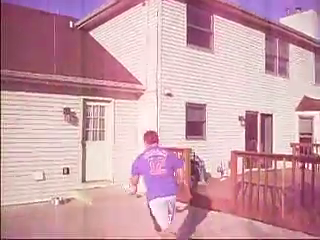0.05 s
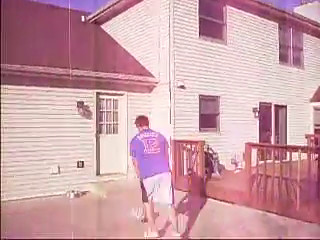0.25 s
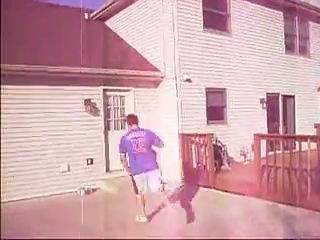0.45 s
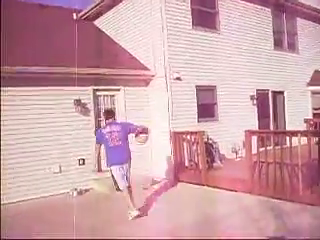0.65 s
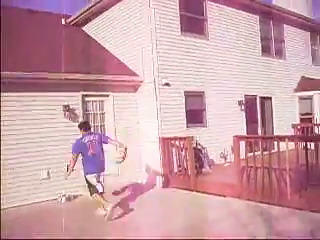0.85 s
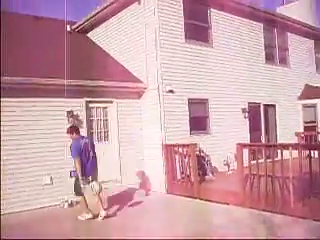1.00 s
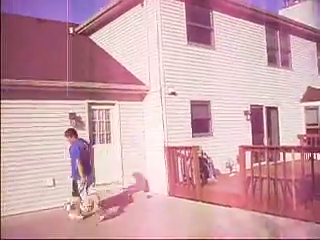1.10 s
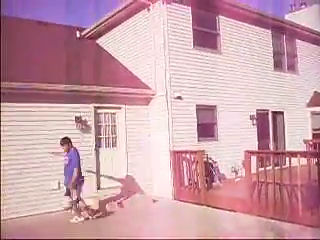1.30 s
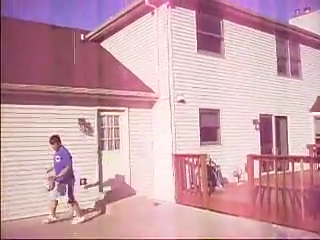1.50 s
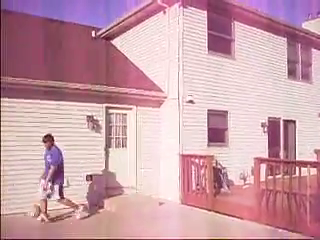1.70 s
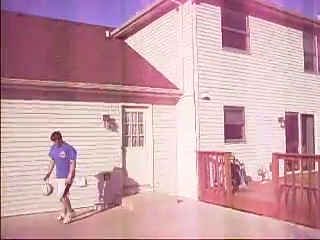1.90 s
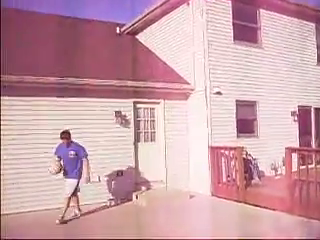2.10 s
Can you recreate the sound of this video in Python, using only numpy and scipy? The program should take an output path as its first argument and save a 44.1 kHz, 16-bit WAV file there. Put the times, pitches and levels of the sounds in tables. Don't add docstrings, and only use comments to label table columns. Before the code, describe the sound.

Shoes scuff, then a basketball hits concrete early, again past the middle, and once more soon after, with quick slaps off nearby house walls; footfalls, faint squeaks and small ticks over low wind, muffled camera microphone.

```python
import sys
import numpy as np
from scipy import signal
from scipy.fft import rfft, irfft
from scipy.io import wavfile
from scipy.ndimage import uniform_filter1d

SR = 44100
rng = np.random.default_rng(int(sys.argv[2]) if len(sys.argv) > 2 else 0)


def pcm_store(signal):
    levels = np.round(np.clip(np.atleast_2d(signal), -1, 1) * 32767)
    wavfile.write(sys.argv[1], SR, levels.astype(np.int16).T)


def voltage_ratio(decibels):
    exponent = np.asarray(decibels, float) / 20
    return 10 ** exponent


N = 94815

# t/s, crack level/dB, skin level/dB, shell level/dB, thump level/dB
ARRIVALS = [(.2800, -26, -0.5, -3, -1.5), (0.2898, -20, -7.5, -17, -9), (0.296, -5, -17, -9, -13.5),
            (0.3027, -24, -14, -16, -14), (0.3049, -26.5, -20, -19, -14.5), (1.2137, -7, -12, -14, -20),
            (1.2249, -10.5, -17, -19, -20), (1.2262, -40, -20.5, -24, -31), (1.2335, -26, -28, -22, -25),
            (1.8120, -3.5, -2.5, -23, -19), (1.8192, -3.5, -17, -23, -24), (1.8244, -28, -13, -22, -15.5),
            (1.8255, -33, -15, -34, -17.5), (1.8298, -22, -24, -36, -22)]
# f/Hz, level/dB, t60/s
SKIN_MODES = [(3120, -5.5, 0.01), (3424, -4.5, 0.0068), (4940, 5, 0.0025), (4080, 1.5, 0.0039),
              (2910, -27, .03)]
# f/Hz, level/dB, t60/s
SHELL_MODES = [(847, -3.5, 0.018), (1010, -6.5, 0.017), (1318, -5, 0.012), (777, -11, 0.018)]
# f/Hz, level/dB, t60/s
THUMP_MODES = [(232.7, 2.5, 0.036), (171, -6.5, 0.044), (300, -28, 0.021)]
# t/s, level/dB, build-up/s
YARD_SCATTER = [
    (0.2803, -34.5, .002),
    (.288, -22, 0.0085),
    (1.214, -34, .002),
    (1.224, -28, 0.004),
    (1.8123, -32, .002),
    (1.819, -25.5, 0.0055),
]
# f/Hz, t60/s
YARD_DECAY = [(100, 0.37), (300, 0.12), (1000, 0.096), (3000, 0.093), (6000, 0.073)]
# f/Hz, level/dB
YARD_COLOUR = [(60, -7.5), (200, 0), (450, -16), (900, -3.5), (2000, -13.5), (3000, -10.5), (4500, -14),
               (6500, -19.5)]
# t/s, length/s, dull level/dB, bright level/dB, rise/share of length
STROKES = [(0.028, 0.044, -46, -48, 0.17), (0.051, 0.014, -39, -39, .3), (0.058, 0.045, -35, -46.5, 0.24),
           (0.112, 0.13, -44.5, -53.5, 0.062), (0.338, 0.12, -42.5, -47, .5),
           (0.413, 0.072, -51.5, -47.5, 0.16), (0.655, 0.027, -57, -54, .1),
           (0.837, 0.011, -38, -37.5, 0.25), (0.847, 0.039, -38.5, -50.5, 0.079),
           (0.929, 0.11, -44, -62, 0.52), (1.171, 0.18, -42.5, -50, 0.043),
           (1.385, 0.037, -43.5, -50.5, 0.31), (1.643, 0.014, -35, -41, 0.064),
           (1.647, 0.048, -48, -56, .2), (1.845, 0.06, -45, -43, .1), (2.06, 0.08, -49.5, -52, .3),
           (0.864, 0.083, -49.5, -64, 0.49), (1.015, 0.14, -49.5, -70, 0.65),
           (1.479, 0.037, -46.5, -55.5, 0.15), (1.528, 0.089, -53.5, -53.5, 0.244),
           (1.671, 0.038, -47.5, -64, 0.26), (1.947, 0.079, -50, -55, 0.53), (0, 0.074, -46.5, -51, 0.11)]
# f/Hz, width/Hz, level/dB
GRIT_BANDS = [(300, 134, -0.5), (720, 490, 5.5), (1270, 150, -18), (2234, 375, 0), (2965, 570, 3),
              (4210, 1800, 2.5)]
# t/s, peak level/dB,
# f/Hz, t60/s
THUDS = [(.0624, -22, 346, 0.018), (.0826, -26.5, 690, 0.036), (.089, -33, 720, 0.08),
         (.0705, -36.5, 700, 0.076), (0.1276, -30.5, 420, 0.031), (0.458, -30, 300, 0.032),
         (0.546, -31.5, 65, 0.12), (.543, -36, 260, 0.065), (.475, -35, 200, 0.046),
         (0.902, -26.5, 201, 0.018), (0.9989, -25, 260, 0.018), (1.0059, -25.5, 540, 0.012),
         (1.0123, -23, 80, 0.059), (1.0128, -22.5, 240, .04), (1.051, -25.5, 59.7, 0.053),
         (0.98, -28.5, 70, 0.047), (1.8131, -22.5, 121, 0.038), (1.8199, -18.5, 120, 0.03),
         (1.215, -17, 150.5, 0.022), (1.6445, -25.5, 486, 0.013), (1.293, -27, 153, 0.02),
         (1.4871, -20, 270, 0.012), (1.4915, -15, 215, 0.01), (1.5, -28, 78, 0.15),
         (1.51, -28.5, 170, 0.028), (1.525, -29.5, 330, .015), (1.5285, -28, 520, 0.01),
         (1.6352, -28, 240, .04), (1.8517, -16.5, 192, 0.032), (1.8598, -23, 328, 0.024),
         (1.88, -29, 255, 0.035), (2.002, -33.5, 593, 0.057), (2.0076, -30, 250, 0.019)]
# t/s,
# level/dB, f/Hz, t60/s
RUBBER_RINGS = [(1.5465, -33, 2250, .022), (.412, -37, 2050, .1), (.15, -36, 1350, .05),
                (.8386, -21, 950, .025), (1.8709, -14, 720, .018), (1.8612, -20, 800, .01),
                (1.6437, -25, 800, .02), (1.004, -26, 1050, .03), (1.2145, -25, 2950, .05),
                (.443, -40, 2080, .06), (.464, -39, 2000, .04), (.515, -45, 2080, .04),
                (.534, -45, 2100, .05), (.39, -36, 620, .08), (1.491, -33, 950, .02),
                (.1262, -30, 1300, .02), (.032, -31, 3850, .02), (.842, -28, 3600, .015),
                (1.054, -34, 600, .03)]
# t/s, peak level/dB, push (1) or pull (-1)
CLICKS = [(.3962, -16, 1), (.9462, -31, 1), (1.0461, -33, 1), (1.798, -29, 1), (1.9461, -20.5, -1),
          (2.0968, -27.5, 1), (.8394, -24, 1), (.8444, -25, -1), (1.6445, -25.5, 1), (1.6464, -29, -1),
          (.0621, -19, -1), (.0626, -21, -1), (1.1752, -33, 1), (.055, -25, -1), (.0461, -30, 1),
          (.0738, -28, 1), (.1001, -29.5, -1), (.1264, -29, 1), (.85, -29, 1)]
# t/s, level/dB
GUSTS = [(0.0, -45), (0.301, -50), (0.45, -44), (0.56, -49), (0.81, -44), (1.12, -39), (1.29, -48.5),
         (1.51, -44), (1.679, -42), (1.891, -41.5), (2.011, -39.5), (2.15, -43.5)]
# f/Hz, level/dB
WIND_COLOUR = [(12, -42), (20, -1), (38, -2.5), (54, -8.5), (123, -7.5), (500, -30), (650, -47),
               (1100, -120)]
# f/Hz, level/dB
AIR_COLOUR = [(59, -43), (100, -0.5), (361, -7), (555, -7), (658, -11), (866, -11), (2460, -22),
              (4410, -22.5), (6000, -27.5), (7800, -58.5), (13200, -120)]

CONTACT_S, SHELL_LAG_S, THUMP_LAG_S, SQUASH_S = 0.00069, 0.0008, 0.0014, 0.0033
LATE_DB, LATE_T60_S = -12, 0.6
GRIT_PER_S, GRIT_SPREAD_DB = 4000, 4.5
LUMP_DB, AIR_DB, AIR_FOLLOWS = 3.5, -48.5, 0.17
EDGE_HZ, EDGE_WIDTH_HZ = 4847, 2210
CLIFF_HZ, CLIFF_WIDTH_HZ = 6150, 450
OVERLOAD = 0.82


def evened(x):
    return x / np.sqrt(np.mean(x ** 2) + 1e-20)


def read(points, hz):
    f, value = np.transpose(points)
    return np.interp(np.log(hz + 1), np.log(f + 1), value)


def add(mix, s, sound):
    part = mix[max(round(s * SR), 0):][:len(sound)]
    part += sound[:len(part)]


def ring(modes, lag_s, rise_s):
    t = np.maximum(np.arange(6000) / SR - lag_s, 0)
    onset = 1 - np.exp(-t / max(rise_s, 1e-5))
    return onset * sum(voltage_ratio(db - 60 * t / t60) * np.sin(2 * np.pi * hz * t) for hz, db, t60 in modes)


def resonate(x, hz, width):
    r = np.exp(-np.pi * width / SR)
    gain = (1 - r * r) / 2
    return signal.lfilter([gain, 0, -gain], [1, -2 * r * np.cos(2 * np.pi * hz / SR), r * r], x)


def noise(tone, length, t60=None):
    window = 128 if t60 else 2048
    hz, t, z = signal.stft(rng.standard_normal(length), SR, nperseg=window)
    level_db = read(tone, hz)[:, None]
    if t60:
        level_db = level_db - 60 * t / read(t60, hz)[:, None]
    return signal.istft(z * voltage_ratio(level_db), SR, nperseg=window)[1][:length]


def ball():
    out = np.zeros(N)
    skin = ring(SKIN_MODES, 0, 0.00014) * 0.5
    shell = ring(SHELL_MODES, SHELL_LAG_S, CONTACT_S)
    thump = ring(THUMP_MODES, THUMP_LAG_S, SQUASH_S)
    for s, crack_db, skin_db, shell_db, thump_db in ARRIVALS:
        add(out, s, voltage_ratio(crack_db) * np.ones(4))
        add(out, s, voltage_ratio(skin_db) * skin + voltage_ratio(shell_db) * shell + voltage_ratio(thump_db) * thump)
    t = np.arange(SR // 2) / SR
    for s, db, build_s in YARD_SCATTER:
        tail = noise(YARD_COLOUR, SR // 2, YARD_DECAY)
        late = evened(noise(YARD_COLOUR, SR // 2)) * voltage_ratio(LATE_DB - 60 * t / LATE_T60_S)
        build = np.minimum(t / build_s, 1) ** 1.2
        add(out, s, voltage_ratio(db) * (tail / tail[:900].std() + late) * build)
    return out


def scuffs():
    sizes = voltage_ratio(GRIT_SPREAD_DB * np.minimum(rng.exponential(1, N), 3))
    grains = sizes * rng.choice([-1., 1.], N) * (rng.random(N) < GRIT_PER_S / SR)
    bands = []
    for hz, width, db in GRIT_BANDS:
        twice = resonate(resonate(grains, hz, width), hz, width)
        bands.append(voltage_ratio(db) * evened(twice))
    dull, bright = evened(sum(bands[:3])), evened(sum(bands[3:]))
    out = np.zeros(N)
    for s, length, dull_db, bright_db, rise in STROKES:
        u = np.arange(0, 2, 1 / (length * SR))
        shape = np.minimum(u / max(rise, 0.02), 1) * voltage_ratio(-18 * np.maximum(u - rise, 0) ** 2)
        at = max(round(s * SR), 0)
        stroke = (dull * voltage_ratio(dull_db) + bright * voltage_ratio(bright_db))[at:at + len(u)]
        add(out, s, shape[:len(stroke)] * stroke)
    return out


def slab_contacts():
    out = np.zeros(N)
    for s, db, hz, t60 in THUDS:
        modes = [(hz, db + 3.0, t60), (hz * 1.4, db - 4, t60 * 0.37), (hz * 5.2, db - 9.5, t60 * 0.1)]
        add(out, s, -ring(modes, 0, 0.12 / hz))
    for s, db, hz, t60 in RUBBER_RINGS:
        add(out, s, ring([(hz, db, t60)], 0, 0.002))
    return out


def ticks():
    out = np.zeros(N)
    for s, db, push in CLICKS:
        add(out, s, push * voltage_ratio(db) * np.ones(5))
    return out


def weather():
    gust_db = np.interp(np.arange(N) / SR, *np.transpose(GUSTS))
    lumps = evened(uniform_filter1d(uniform_filter1d(rng.standard_normal(N), 900), 900))
    wind = evened(noise(WIND_COLOUR, N)) * voltage_ratio(gust_db + LUMP_DB * lumps)
    air_db = AIR_DB + AIR_FOLLOWS * (gust_db - gust_db.mean())
    return wind + evened(noise(AIR_COLOUR, N)) * voltage_ratio(air_db)


def scene():
    return (ball() + scuffs() + slab_contacts() + ticks() + weather())[None]


def band_limit(x):
    return signal.sosfilt(signal.butter(12, 16600, fs=SR, output="sos"), x)


def record(dry):
    hz = np.fft.rfftfreq(N, 1 / SR)
    slope_db = -55 * np.clip((hz - EDGE_HZ) / EDGE_WIDTH_HZ, 0, 1.5) ** 1.77
    cliff_db = -60 * np.clip((hz - CLIFF_HZ) / CLIFF_WIDTH_HZ, 0, 1)
    x = irfft(rfft(dry) * voltage_ratio(slope_db + cliff_db), N)
    top = OVERLOAD * abs(x).max()
    return band_limit(np.clip(x, -top, top))


dry = scene()
out = record(dry)
pcm_store(out)
```